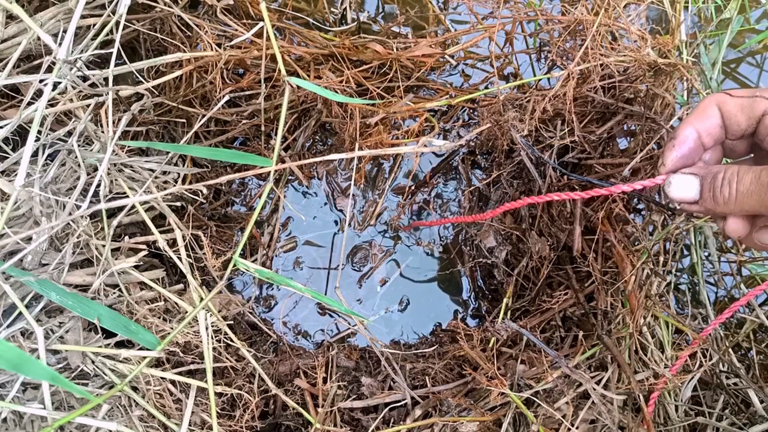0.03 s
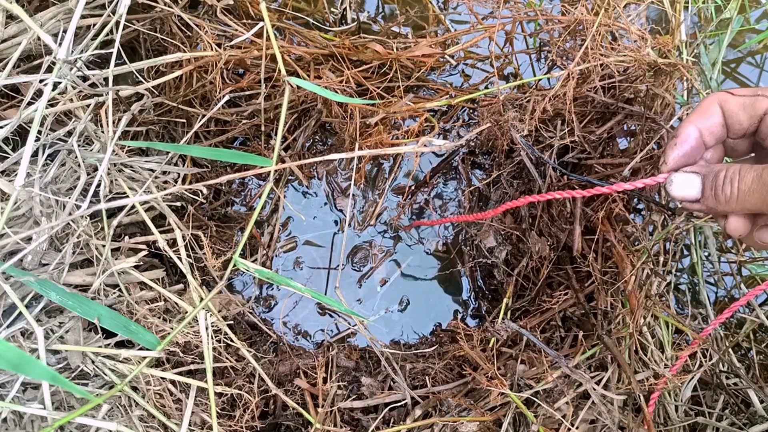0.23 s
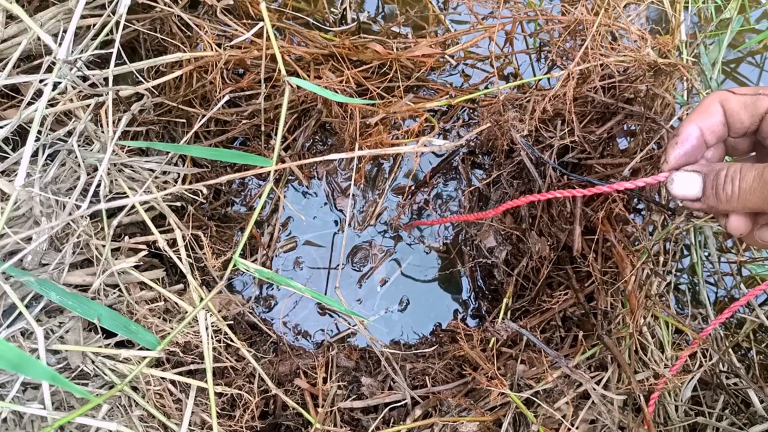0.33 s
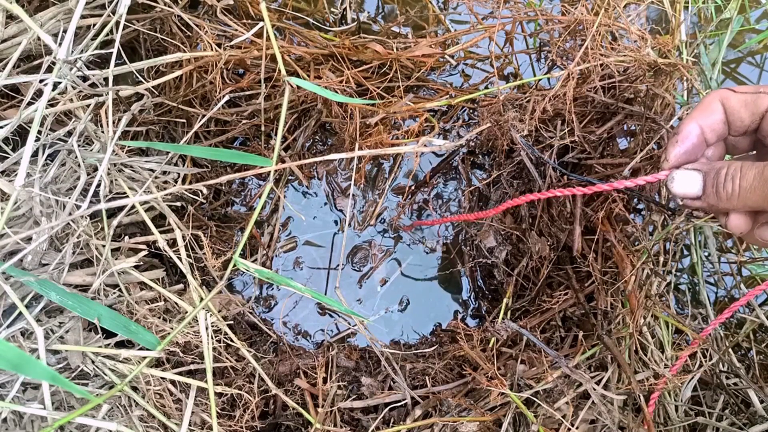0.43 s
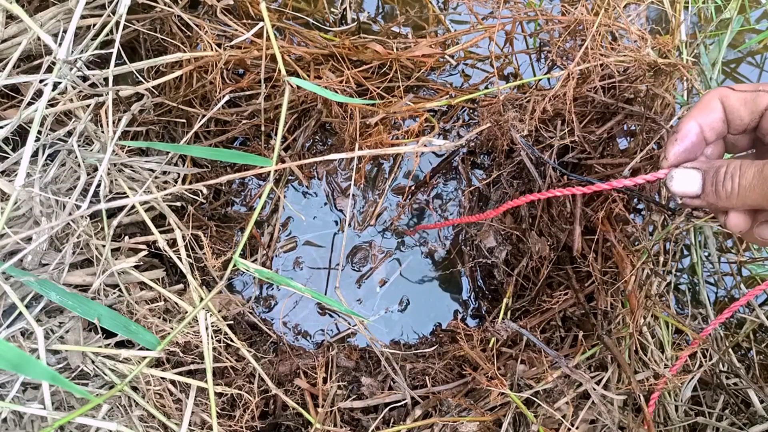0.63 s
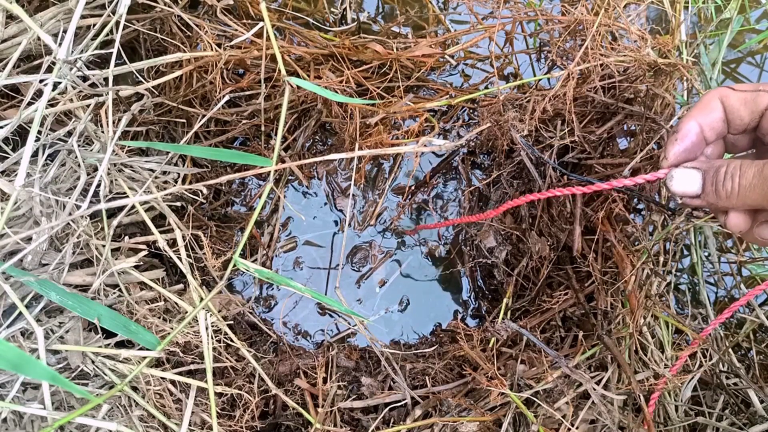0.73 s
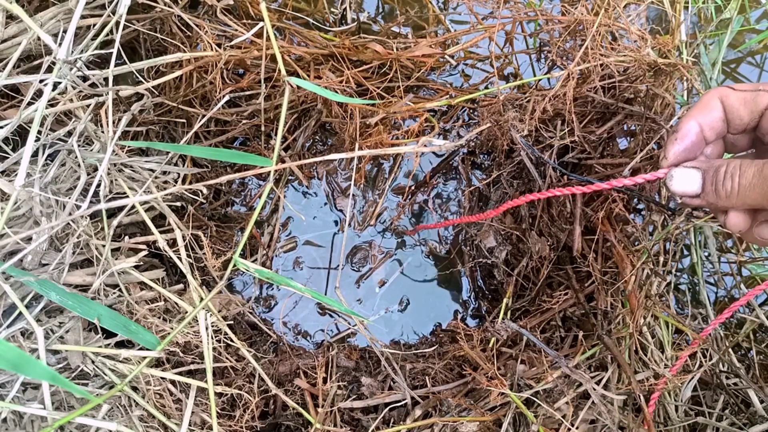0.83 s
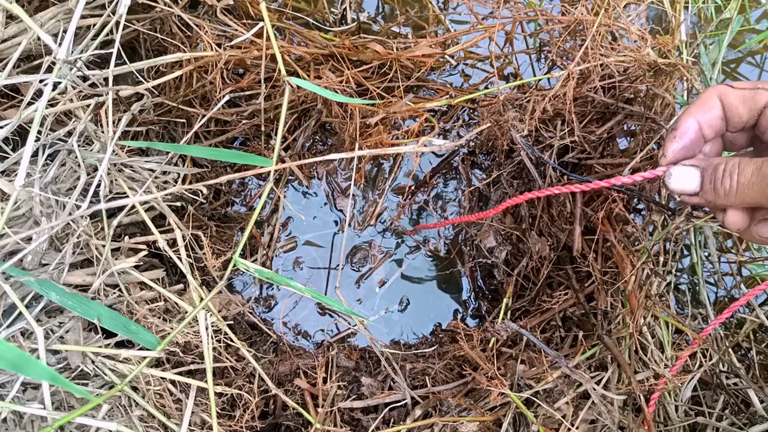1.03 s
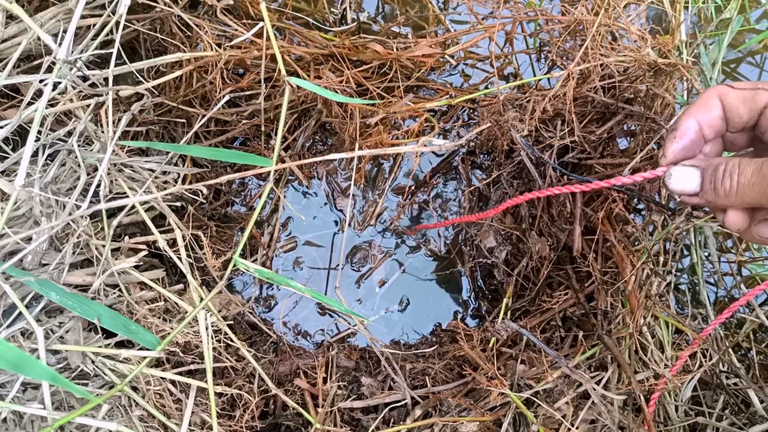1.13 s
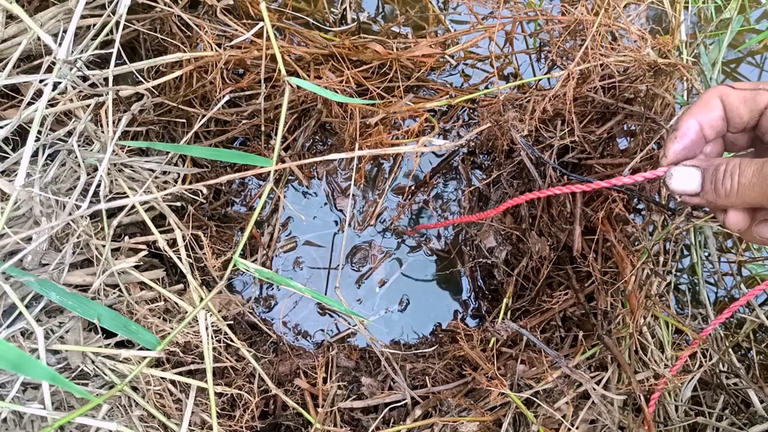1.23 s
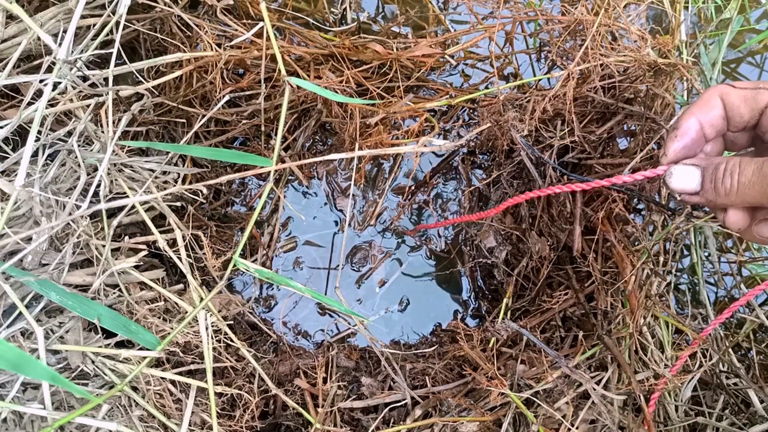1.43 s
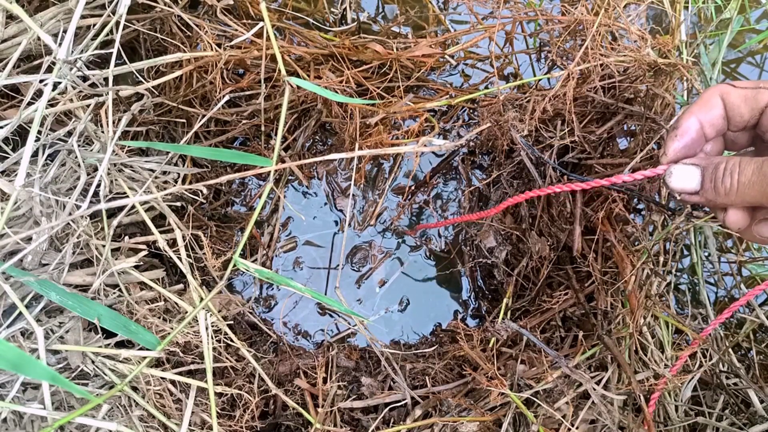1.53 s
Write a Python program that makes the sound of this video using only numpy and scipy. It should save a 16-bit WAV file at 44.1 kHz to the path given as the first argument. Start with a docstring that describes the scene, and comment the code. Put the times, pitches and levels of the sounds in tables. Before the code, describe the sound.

Dry stems or a cord being tugged, crackling in short sharp ticks over faint insect chirring

```python
"""From the start a field rumbles and hisses, made of random noise spectra, on two microphone ports.
Over it insects chirr in narrow high bands of pulsed noise, and near singers on the left whistle downwards.
From 0.16 s something stiff and dry (stems or a cord being tugged) crackles six times close to the right
port. Each tug is a run of sharp ticks with a hollow knock, made of short dying tones, over a fine crackle
of tiny random clicks."""
import sys
import numpy as np
from scipy import signal
from scipy.io import wavfile
from scipy.ndimage import uniform_filter1d

SR = 44100
rng = np.random.default_rng(int(sys.argv[2]) if len(sys.argv) > 2 else 0)


def natural_amplitude(level_db):
    """Convert a level in decibels to a linear amplitude factor, elementwise."""
    exponent = np.asarray(level_db, float) / 20
    return 10 ** exponent


def master_out(mix):
    """Clip the mix to full scale and print it as 16-bit PCM to the path in sys.argv[1]."""
    frames = np.transpose(np.atleast_2d(mix))
    ceiling = np.clip(frames, -1, 1)
    pcm = np.round(ceiling * 32767).astype(np.int16)
    wavfile.write(sys.argv[1], SR, pcm)


N = 68355  # length in samples

# How loud the insects are over time, each band rising and sinking on its own.
# Each row: time in seconds, then gain in dB of the bands near 10 kHz, 7 kHz and 5 kHz.
SWELL_CURVES = [(0, -0.5, 0.054, 0.5), (.5, -3.5, 0.97, 8.5), (.7, -4.5, -0.14, 12), (.85, -3.5, -2, 4.5),
                (1.05, 1, 0.64, 5), (1.25, -2, 0.17, -1.5), (1.55, -3, 0.48, 7)]
FLUTTER_DB = 1.0  # quick unsteadiness of every insect, rms


def read(points, hz):
    """Looks up the value of a (Hz, value) table, with pitch on a logarithmic scale."""
    f, value = np.transpose(points)
    return np.interp(np.log(hz + 1), np.log(f + 1), value)


def evened(x):
    """Scales a sound to an rms of 1."""
    return x / np.sqrt(np.mean(x ** 2) + 1e-20)


def coloured(x, points):
    """Filters a sound with the gains of a (Hz, dB) table, without sounding ahead of its cause."""
    hz = abs(np.fft.fftfreq(8192, 1 / SR))
    log_gain = read(points, hz) * np.log(10) / 20
    # the Hilbert transform gives the phase that packs the response as early as possible
    response = np.exp(np.conj(signal.hilbert(log_gain)))
    taps = np.fft.ifft(response).real[:2048]
    return signal.oaconvolve(x, taps)[:N]


def resonate(x, hz, width):
    """Rings like one fixed resonance of gain 1, the width in Hz setting how fast it dies."""
    turn = np.exp(2j * np.pi * hz * np.arange(len(x)) / SR)
    r = np.exp(-np.pi * width / SR)
    # shift the band down to 0 Hz, smooth there, and shift it back up
    smooth = signal.lfilter([1 - r], [1, -r], x / turn)
    return 2 * (turn * smooth).real


def wander(rate):
    """Drifts irregularly at rms 1: twelve sines up to rate (Hz), the slow ones stronger."""
    t = np.arange(N) / SR
    drift = 0
    for f in np.geomspace(rate / 20, rate, 12):
        drift = drift + np.sin(2 * np.pi * (f * t + rng.random())) / np.sqrt(f)
    return evened(drift)


def air():
    """Open-field rumble and hiss: random short-time spectra, bass alike in both ports, in faint patches."""
    # Balance of rumble and hiss. Each row: pitch in Hz, relative level in dB.
    air_colour = [(12, -33.5), (22, -16), (65, -0.5), (110, -6), (175, -8.5), (260, -20), (700, -32),
                  (1600, -36), (3500, -44.5), (6000, -47), (10000, -48.5), (12000, -57.5), (16000, -46)]
    # How alike the two ports are. Each row: pitch in Hz, likeness from 0 to 1.
    likeness = [(60, 0.99), (200, 0.88), (380, 0.33), (700, 0.19), (1300, 0.016), (16000, .0)]
    air_db, patch_db = -53, -0.5  # overall rms level; rms gain of the patches (the sign only flips them)
    frames, hz = N // 512 + 5, np.fft.rfftfreq(2048, 1 / SR)
    a, b, c, d, patches = rng.standard_normal((frames, 1025, 5)).T
    patches = uniform_filter1d(patches, size=20, axis=0)  # broad in pitch
    patches = evened(uniform_filter1d(patches, size=6, axis=1))  # and lasting in time
    same = read(likeness, hz)[:, None]
    left = a + 1j * b
    right = same * left + np.sqrt(1 - same ** 2) * (c + 1j * d)
    spectra = np.array([left, right])
    spectra *= natural_amplitude(read(air_colour, hz)[:, None] + patch_db * patches)
    sound = signal.istft(spectra, nperseg=2048, noverlap=1536)[1][:, :N]
    return natural_amplitude(air_db) * evened(sound)


def insects():
    """Choirs of quick scraped pulses: noise rings in narrow bands, drawn separately for each port."""
    # The choirs. Each row: pitch in Hz, width in Hz of each of two resonances, level in dB before swelling,
    # depth of the pulses from 0 to 1, left minus right in dB.
    choirs = [(7020, 560, -78, .3, -22.5), (6640, 1200, -78.5, 0.2, 1), (4815, 410, -84, 0.5, -5),
              (14360, 270, -87, .3, -0.5), (9720, 600, -76.5, 0.7, 8)]
    # One number per choir: the column of the swell curves it follows.
    swell_columns = [2, 2, 3, 2, 1]
    pulses_per_s, slip_turns = [78, 88], .05  # mean rates; rms drift of the beat in cycles
    t, out = np.arange(N) / SR, np.zeros((2, N))
    beats = []
    for rate in pulses_per_s:
        turns = rate * t + rng.random() + slip_turns * wander(16)
        beats.append(np.cos(2 * np.pi * turns))
    for (hz, width, level_db, depth, pan_db), column in zip(choirs, swell_columns):
        beat = beats[column - 2]  # column 2 takes the slower beat, columns 1 and 3 the faster
        pulses = (1 + depth * beat) * natural_amplitude(FLUTTER_DB * wander(30))
        swell = natural_amplitude(np.interp(t, *np.transpose(SWELL_CURVES)[[0, column]]))
        for port, side in enumerate((.5, -.5)):
            noise = rng.standard_normal(N)
            wings = resonate(resonate(noise, hz, width), hz, width)
            out[port] += natural_amplitude(level_db + side * pan_db) * swell * evened(pulses * wings)
    return out


def singers():
    """Near singers drift in and out of step, each chirp a short rough whistle that slides down."""
    # The singers. Each row: mean chirps per second, time offset of the chirps in seconds,
    # level in dB relative to the nearest singer.
    near_singers = [(88.3, .0099, 0), (89.4, .011, -4), (98, .004, -7)]
    top_hz, fall_hz, roughness = 10150, 950, .55  # start of the slide; its fall; rms roughness
    singers_db, right_db = -72, -13.5  # nearest singer before flutter and swell; right port against left
    t, out = np.arange(N) / SR, 0
    for rate, start, level_db in near_singers:
        u = (rate * (t - start) + .05 * wander(15)) % 1  # place within the chirp, 0 to 1
        tone = np.sin(2 * np.pi * np.cumsum(top_hz - fall_hz * u ** 1.5) / SR)
        rough = 1 + roughness * evened(uniform_filter1d(rng.standard_normal(N), size=30))
        chirps = evened(np.sin(np.pi * u ** .8) ** 2 * rough * tone)
        out = out + natural_amplitude(singers_db + level_db + FLUTTER_DB * wander(30)) * chirps
    swell = natural_amplitude(np.interp(t, *np.transpose(SWELL_CURVES)[:2]))
    return out * swell * natural_amplitude(np.array([[0], [right_db]]))


def ticks():
    """Each tick is a sudden inward snap that sets off several dying tones, grouped in four voices."""
    # Single ticks. Each row: start in seconds, levels in dB of the knock, body, ring and bright voices,
    # pitch of the ring in Hz.
    single_ticks = [(0.1602, -55, -44, -82, -59, 2860), (0.2347, -49, -43, -17.5, -32, 4260),
                    (0.24, -46, -49, -16.5, -30, 4100), (0.2419, -49, -36, -23, -19.5, 3660),
                    (0.2464, -63, -56, -17.5, -29, 3600), (0.2501, -37, -44, -15, -41, 3550),
                    (0.254, -30, -16.5, -3.5, -21.5, 3455), (0.262, -22, -43, -14, -18, 3360),
                    (0.2648, -11.5, -7.5, -16, -14.5, 2850), (0.266, -35, -35, -10.5, -22, 2580),
                    (0.2758, -34.5, -50, -46.5, -43, 3520), (0.2811, -44, -26, -31, -34, 2950),
                    (0.4134, -66, -37.5, -39, -49, 3530), (0.4201, -19, -26, -55, -55, 2680),
                    (0.4223, -30, -18.5, -32.5, -55.5, 3670), (0.4244, -24.5, -21.5, -24.5, -38, 3640),
                    (0.5041, -46, -60.5, -59.5, -66, 4160), (0.5801, -59, -46, -29.5, -34.5, 3890),
                    (0.5856, -51, -43, -28, -59.5, 3120), (0.5941, -24.5, -24, -19.5, -31, 3400),
                    (0.6, -54, -62, -24.5, -54, 3020), (0.6053, -26.5, -29, -17, -40.5, 2970),
                    (0.6115, -25, -21, -17.5, -37, 3270), (0.6142, -22.5, -20.5, -25, -59, 2310),
                    (0.6194, -43, -35, -42, -58, 3170), (0.6737, -58.5, -66.5, -44.5, -65, 3676),
                    (0.7602, -45, -40.5, -43.5, -58.5, 3510), (0.7679, -21, -16, -20, -27, 3200),
                    (0.771, -32, -35.5, -53.5, -45, 3240), (0.868, -61, -49.5, -56, -80, 4200),
                    (0.874, -37.5, -42, -74, -66.5, 2540), (0.9285, -54, -44, -35.5, -60, 3400),
                    (0.934, -28, -49, -31.5, -52, 3160), (0.9389, -56, -25.5, -29, -62, 3150),
                    (0.9429, -30.5, -29, -27, -51, 3100), (0.9458, -59, -32, -13, -48, 2825),
                    (0.9492, -10.5, -15, -17.5, -54, 3190), (0.9561, -30.5, -50, -48, -39.5, 2700),
                    (1.027, -71, -65, -54.5, -66.5, 3750), (1.1168, -34, -45, -17, -54, 3310),
                    (1.1221, -25.5, -28, -28.5, -58, 3400), (1.1238, -38, -35, -31, -56, 3020),
                    (1.1305, -42, -27.5, -20, -57.5, 2760), (1.1393, -16, -21.5, -16.5, -25.5, 3030),
                    (1.1415, -12.5, -17, -15, -30, 3300)]
    # The tones of a tick. Each row: mean pitch in Hz, seconds to die by 60 dB, rise time in seconds,
    # level in dB on top of its voice. Faint ticks lengthen both times.
    tick_modes = [(408, 0.013, 0.0017, -5), (502, 0.0088, .001, 2), (928, 0.023, .00003, -17),
                  (1436, 0.0092, 0.000079, -3), (2010, 0.0037, .00003, 1.5), (2085, 0.0066, 0.00004, -4),
                  (3400, 0.007, 0.0004, 5), (6650, 0.0034, 0.00009, 6.5), (14340, 0.0039, 0.000027, -6)]
    voice_of_mode = [0, 0, 1, 1, 1, 1, 2, 3, 3]  # 0 knock, 1 body, 2 ring, 3 bright
    ring_mode = 6  # this row takes its pitch from the tick instead
    detune, ring_rough = .03, .5  # rms spread of pitch; a ring is chattering, not pure
    faint_db, faint_slower = -45, 2.5  # faint ticks come on and die more softly
    out, t = np.zeros(N + 4000), np.arange(3000) / SR
    bend = 1 + detune * rng.standard_normal((len(single_ticks), len(tick_modes)))
    chatter = 1 + ring_rough * evened(uniform_filter1d(rng.standard_normal(N + 4000), size=20))
    for (start, *voices_db, ring_hz), bends in zip(single_ticks, bend):
        at = int(start * SR)
        slow = faint_slower if max(voices_db) < faint_db else 1
        for m, (hz, t60, rise, db) in enumerate(tick_modes):
            hz = ring_hz if m == ring_mode else hz * bends[m]
            decay = natural_amplitude(voices_db[voice_of_mode[m]] + db - 60 * t / (t60 * slow))
            shape = decay * (1 - np.exp(-t / (rise * slow ** 2)))
            if m == ring_mode:
                shape *= chatter[at:at + 3000]
            out[at:at + 3000] -= shape * np.sin(2 * np.pi * hz * t)  # minus: the snap starts inward
    return out[:N]


def crackle():
    """Dense small grains swell to the peak of each tug and then fade."""
    # The tugs. Each row: start in seconds, peak in seconds, start level in dB, peak level in dB,
    # seconds from the peak to 60 dB down, extra dB in the treble band, extra dB in the topmost band.
    tugs = [(0.2325, 0.267, -30.5, -27.5, 0.032, 16, 2), (0.395, 0.414, -55, -44, 0.05, 0.5, 4),
            (0.5794, 0.607, -38.5, -36, 0.033, 9.5, 3), (0.755, 0.769, -48, -44, 0.021, 13, 2),
            (0.9259, 0.952, -42, -37, 0.018, 6.5, 8.5), (1.1143, 1.138, -39.5, -37.5, 0.046, 4, -8)]
    # Colour of the grains. Each row: pitch in Hz, relative level in dB.
    grain_colour = [(200, -38), (450, 3), (750, -11), (1400, 4.5), (2400, -4), (3500, -5), (4300, -5),
                    (4900, -14), (6400, -11), (10000, -28.5), (12600, -30.5), (14700, -19), (16000, -24.5)]
    a, b, c, d = 1800, 4800, 9000, 13500  # Hz; grains of different size crackle independently
    grains_per_s, spread_db = 4000, 4
    clump_db, fade_power = 4, 3  # grains clump for a few ms; a higher power: later start, steeper end of fade
    t, level = np.arange(N) / SR, np.zeros((5, N))
    for start, peak, start_db, peak_db, fade, treble_db, top_db in tugs:
        swell_db = np.interp(t, [start, peak], [start_db, peak_db])
        fall_db = 60 * (np.maximum(t - peak, 0) / fade) ** fade_power
        shape = (t > start) * natural_amplitude(swell_db - fall_db)
        level += shape * natural_amplitude(np.array([0, 0, 0, treble_db, top_db]))[:, None]
    size = natural_amplitude(spread_db * np.minimum(rng.exponential(1, level.shape), 3))
    present = rng.random(level.shape) < grains_per_s / SR
    grains = rng.choice([-1., 1.], level.shape) * size * present
    clumps = evened(uniform_filter1d(rng.standard_normal(level.shape), size=150, axis=1))
    grains *= natural_amplitude(clump_db * clumps)
    grains = np.array([evened(g) for g in grains])
    grains /= coloured(grains[0], grain_colour).std()  # so that colouring leaves the rms near 1
    bands = [(a, "low"), ([a, b], "band"), ([b, c], "band"), ([c, d], "band"), (d, "high")]
    mix = 0
    for (hz, kind), band_grains in zip(bands, grains * level):
        mix = mix + signal.sosfilt(signal.butter(3, hz, kind, fs=SR, output="sos"), band_grains)
    return coloured(mix, grain_colour)


def scene():
    """Air and insects all around, ticks and crackle near the right port, later and duller at the left."""
    # Shading of the left port, which is further from the ticks. Each row: pitch in Hz, gain in dB.
    far_shade = [(500, -9), (1200, -3.5), (2000, -9), (3400, -3), (7000, -24), (10000, -8), (15000, -18)]
    far_lag = 10  # samples
    around = air() + insects() + singers()
    low_cut = signal.butter(3, 335, "high", fs=SR, output="sos")  # small pieces radiate no bass
    near = signal.sosfilt(low_cut, ticks() + crackle())
    far = coloured(np.r_[np.zeros(far_lag), near[:-far_lag]], far_shade)
    return np.array([far, near]) + around


def top_cut(x):
    """Nothing passes above the cut-off."""
    return signal.sosfilt(signal.butter(12, 16640, fs=SR, output="sos"), x)


def record(dry):
    """Each microphone port colours the sound in its own way, and a steep filter limits the treble."""
    # Colour of the left and right microphone ports. Each row: pitch in Hz, gain in dB.
    left_colour = [(3500, -2), (5100, -3), (5600, -11), (6500, -17), (7100, -10), (8200, -0.5), (10000, 11),
                   (10700, 5.5), (11300, -16.5), (13300, -16), (14300, -33.5), (16000, -50.5)]
    right_colour = [(7500, -1), (9800, -13.5), (10600, -23), (12000, -1), (15300, 2)]
    ports = np.array([coloured(dry[0], left_colour), coloured(dry[1], right_colour)])
    treble_limit = signal.firwin(255, 15350, window=("kaiser", 9), fs=SR)  # edge in Hz
    ports = signal.oaconvolve(ports, treble_limit[None], "same")
    return top_cut(ports)


dry = scene()
out = record(dry)
master_out(out)
```